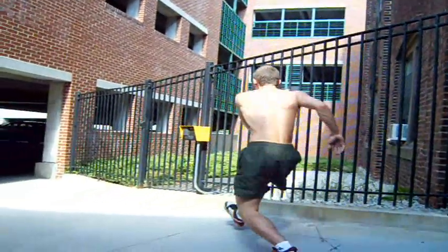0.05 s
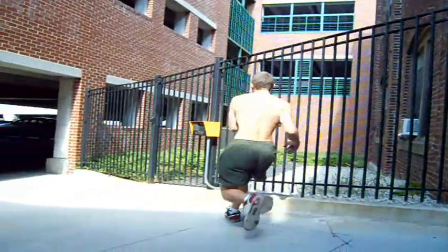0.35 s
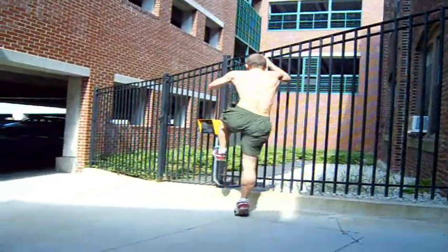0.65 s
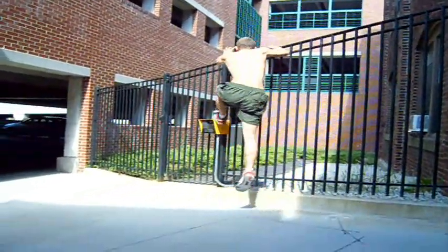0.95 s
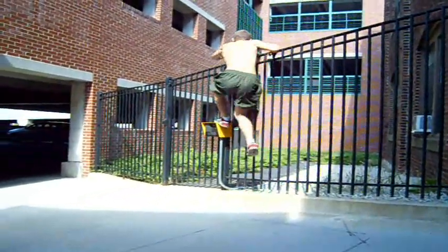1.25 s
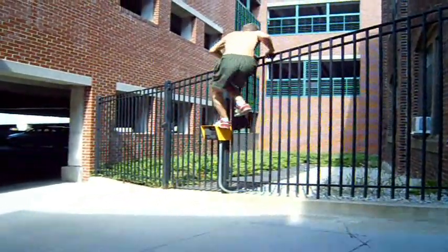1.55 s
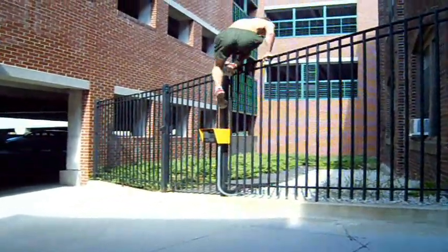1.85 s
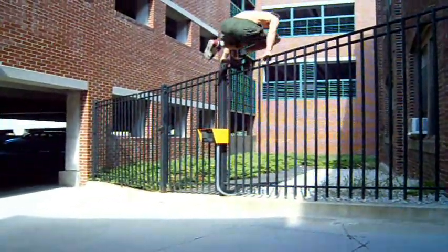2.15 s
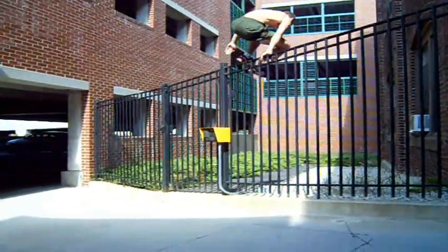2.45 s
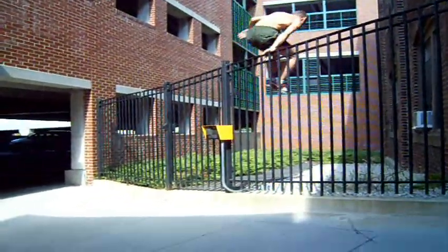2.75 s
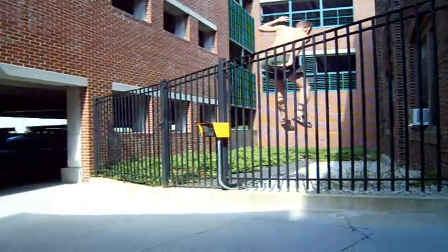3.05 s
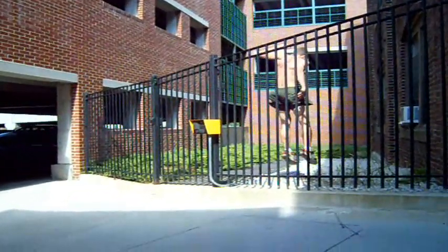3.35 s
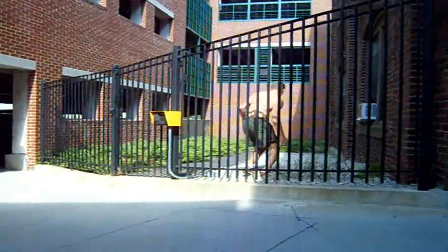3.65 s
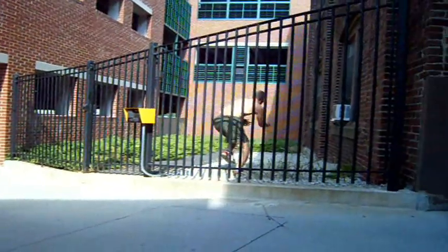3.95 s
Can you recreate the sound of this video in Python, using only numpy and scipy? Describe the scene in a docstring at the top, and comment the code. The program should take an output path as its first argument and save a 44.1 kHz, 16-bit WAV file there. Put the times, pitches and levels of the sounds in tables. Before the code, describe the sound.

A metal gate clanks and rattles under a climber's hands and shoes after a shoe slaps concrete. Feet then crunch onto gravel with a thud. Brick walls echo over low town noise, slightly dulled by a small microphone.

```python
"""A shoe slaps concrete, a steel picket gate clanks, and two feet crunch into gravel: a runner climbs over.
Shoes and hands scuff and knock the bars, which rattle and ring; brick walls throw every sound back.
Town noise and a low rumble of air lie underneath. The small microphone dulls the treble."""
import sys
import numpy as np
from scipy import signal
from scipy.fft import rfft, irfft
from scipy.io import wavfile

SR = 44100
rng = np.random.default_rng(int(sys.argv[2]) if len(sys.argv) > 2 else 0)


def file_out(sig):
    """Save sig as 16-bit WAV at sys.argv[1]."""
    # one column per channel
    cols = np.atleast_2d(sig).T
    # limit, then scale
    lim = np.clip(cols, -1, 1)
    pcm = np.round(lim * 32767).astype(np.int16)
    wavfile.write(sys.argv[1], SR, pcm)


N = 176400
T = np.arange(N) / SR
GRIT_PER_S = 7600
# The sharp tone of crackling sand. Each row: frequency in Hz, relative level in dB.
SAND_TONE = [(1500, -30), (3300, -20), (4500, 0), (8000, -2), (15000, -5)]


def gate():
    """Each knock on the gate is a bright tick and a short clank; the bars rattle briefly with it."""
    # Hands and shoes hit the bars. Each row: start in seconds, level in dB, pitch in Hz.
    knocks = [(1.246, -33, 1850), (1.314, -30.5, 1780), (1.346, -31, 1680), (1.4636, -14.5, 1590),
              (1.684, -22.5, 1600), (1.793, -31, 1480), (2.0145, -26.5, 1520), (2.073, -34, 1750),
              (2.1725, -23, 1500), (2.3925, -26, 1780)]
    # The tones of one clank. Each row: multiple of the pitch, level in dB, seconds to fade by 60 dB.
    clank_tones = [(.58, -23, .02), (.85, -4, .012), (1.0, -1, .012), (1.17, -3, .012)]
    # The tone of the rattling bars. Each row: frequency in Hz, relative level in dB.
    rattle_tone = [(300, -6), (900, -5.5), (1150, 0), (1400, 4), (1900, 0), (2400, -31), (3400, -9.5),
                   (5000, -7), (15000, -27)]
    treble = signal.butter(4, 3930, "high", fs=SR, output="sos")
    tick = signal.sosfilt(treble, rng.standard_normal(N))
    rattle = colour(grains(per_s=3000, spread_db=2.5), rattle_tone)
    out, lead_s = np.zeros(N), 0.0035
    for start, db, hz in knocks:
        force = amp(db) * (np.arange(N) == int(start * SR))
        for k, (ratio, tone_db, t60) in enumerate(clank_tones):
            out += (-1) ** k * amp(tone_db) * ring(force, hz * ratio, t60)
        out += tick * swell(start, db - 9.5, rise=0.001, t60=0.021)
        out += rattle * swell(start - lead_s, db - 13, rise=lead_s, t60=0.13)
    return out


def take_off():
    """Heel and sole strike the concrete in turn and make the shoe ring; the sole grinds on grit."""
    # Heel touch, heel weight and sole slap. Each row: time in seconds, level in dB, contact in seconds.
    pushes = [(.3088, -12, 0.00077), (.3205, -14, 0.0019), (.3873, -0.5, 0.00034)]
    # The ring of the shoe. Each row: pitch in Hz, level in dB, seconds to fade by 60 dB.
    shoe_tones = [(123, -13.5, 0.06), (225, -17, 0.09), (363, -10, 0.062), (388, -13, 0.074),
                  (660, -5.5, 0.034), (1256, -8, 0.082)]
    # The tone of grit under the sole. Each row: frequency in Hz, relative level in dB.
    sole_tone = [(80, -17), (300, -4), (480, -12), (660, 3.5), (850, -7.5), (1220, 5), (1480, -5),
                 (1720, 2.5), (2300, -7), (3300, -12.5), (6000, -15), (15000, -37)]
    force = np.zeros(N)
    for time, db, contact in pushes:
        push = np.exp(-2 * ((T - time) / contact) ** 2)
        force += amp(db) * push / push.sum()
    shoe = sum(amp(db) * ring(force, hz, t60) for hz, db, t60 in shoe_tones)
    grit = gritty(GRIT_PER_S, sole_tone, spread_db=2.1)
    return shoe + grit * swell(start=0.38, db=-15.5, rise=0.0066, t60=0.1, hold=0.007)


def landing():
    """One foot, then the other, crushes the gravel; loose stones settle."""
    # The crunches. Each row: start in seconds, level in dB, seconds to rise, seconds to fade by 60 dB.
    crunches = [(3.569, -18.5, 0.019, .14), (3.595, -12.5, 0.013, 0.13), (3.64, -27.5, 0.039, 0.9)]
    # The tone of gravel. Each row: frequency in Hz, relative level in dB.
    gravel_tone = [(100, -28), (330, 4), (560, 2), (850, -3), (1300, 0.5), (1800, 3.5), (2200, 2.5),
                   (2700, -0.5), (3400, 1), (4500, -1.5), (8000, -13), (15000, -17)]
    stones = gritty(per_s=9000, tone=gravel_tone, spread_db=1.5)
    return stones * sum(swell(*row) for row in crunches)


def thuds():
    """The body's weight comes down on the ground in dull bumps."""
    # The bumps. Each row: start in seconds, level in dB, seconds to rise, seconds to fade by 60 dB.
    bumps = [(.198, -35, .003, 0.052), (.308, -21.5, 0.013, 0.2), (3.597, -23.5, 0.028, 0.085),
             (3.647, -25.5, 0.0048, 0.49)]
    # The tone of a bump. Each row: frequency in Hz, relative level in dB.
    bump_tone = [(30, -19), (120, -9.5), (230, 2.5), (340, 2), (560, -10), (900, -37), (3000, -92)]
    return colour(rng.standard_normal(N), bump_tone) * sum(swell(*row) for row in bumps)


def scuffs():
    """Rubber and skin catch and slip many times in each rub, with a hoarse squeal."""
    # Shoes and hands rub on ground and bars. Each row: start in seconds, level in dB,
    # seconds to rise, seconds to fade by 60 dB, squeal pitch in Hz.
    rubs = [(0.097, -29, 0.00073, 0.027, 2220), (.135, -44, 0.006, 0.83, 2270),
            (0.269, -38.5, 0.011, 1, 2740), (0.782, -39.5, 0.018, 0.12, 3030),
            (0.952, -41, 0.004, .1, 1320), (1.111, -33.5, 0.013, 0.13, 1860),
            (1.16, -40.5, 0.025, 0.96, 1980), (1.78, -38, 0.0087, 0.18, 1430),
            (1.895, -41.5, 0.011, 0.12, 2080), (2.066, -39.5, 0.0041, 0.35, 1900),
            (2.388, -33, 0.0044, 0.21, 1870), (2.8, -42, 0.012, 0.54, 2320)]
    # The tone of slipping rubber. Each row: frequency in Hz, relative level in dB.
    rubber_tone = [(100, 1), (400, 8.5), (900, -1), (1400, 4), (1900, 2), (2500, -4.5), (3300, -8),
                   (5000, -1.5), (8000, -20.5), (15000, -18.5)]
    catches = gritty(GRIT_PER_S, rubber_tone, spread_db=3.5)
    out = np.zeros(N)
    for start, db, rise, t60, hz in rubs:
        squeal = unit(ring(rng.standard_normal(N), hz, t60=0.0079))
        out += (catches + amp(-6.5) * squeal) * swell(start, db, rise, t60)
    return out


def pickets(contact):
    """The gate's steel tubes go on ringing faintly after they are touched."""
    # The ring of the tubes. Each row: pitch in Hz, level in dB, seconds to fade by 60 dB.
    tube_tones = [(1005, -46, 0.16), (1404, -52, 0.26), (1824, -43.5, 0.069), (2055, -49, 0.094),
                  (2480, -45.5, 0.1), (2720, -43.5, 0.2)]
    return sum(amp(db) * ring(contact, hz, t60) for hz, db, t60 in tube_tones)


def yard(sound):
    """Brick walls send back a few clear echoes and a blurred wash that dies away."""
    # Echoes off the walls. Each row: delay in seconds, level in dB.
    echoes = [(.008, -19), (.031, -29), (.062, -22.5), (.088, -23.5)]
    # How long the wash lasts. Each row: frequency in Hz, seconds to fade by 60 dB.
    wash_fades = [(100, 2.1), (400, 1.8), (1000, 1.23), (2500, 1.31), (5000, 0.95), (14000, 1.1)]
    # How strong the wash is. Each row: frequency in Hz, level in dB.
    wash_levels = [(100, -8.5), (350, -13.5), (700, -9), (1500, -7.5), (3000, -11), (6000, -10.5),
                   (14000, -12.5)]
    edges_hz, out = np.geomspace(70, 17000, 15), np.zeros(N)
    for low, high in zip(edges_hz, edges_hz[1:]):
        band = signal.butter(3, [low, high], "band", fs=SR, output="sos")
        hz = np.sqrt(low * high)
        # Smear this band's energy over time, then let noise follow its loudness.
        decay = swell(0, 0, rise=0.019, t60=at_hz(wash_fades, hz)) ** 2
        energy = signal.sosfilt(band, sound + 1e-18) ** 2
        smeared = signal.fftconvolve(energy, decay / decay.sum())[:N]
        noise = unit(signal.sosfilt(band, rng.standard_normal(N)))
        out += amp(at_hz(wash_levels, hz)) * np.sqrt(np.abs(smeared)) * noise
    for delay, db in echoes:
        out += amp(db) * np.interp(T - delay, T, sound, left=0)
    return out


def background():
    """A low rumble of air and the noise of the town each swell and sink slowly."""
    # The tone of each. Each row: frequency in Hz, relative level in dB.
    rumble_tone = [(10, 1.5), (24, 2.5), (31, -2.5), (40, -9.5), (50, -7), (80, -10.5), (145, -8),
                   (200, -26), (500, -48)]
    town_tone = [(40, 7), (140, 0), (200, 1), (350, 0), (550, -4.5), (1000, -7.5), (1900, -13.5),
                 (3000, -22.5), (5000, -22.5), (8000, -30.5), (15000, -39.5)]
    # The loudness of each. Each row: time in seconds, level in dB.
    rumble_levels = [(0, -28.5), (.4, -38.5), (.9, -38), (1.3, -37.5), (1.9, -39), (2.7, -34),
                     (3.45, -29.5), (3.85, -35.5), (4, -38)]
    town_levels = [(0, -35.5), (.3, -34), (0.701, -41), (1.05, -40.5), (1.5, -38), (2.05, -39),
                   (2.65, -36.5), (3.099, -34.5), (3.5, -33.5), (4, -38.5)]
    out = np.zeros(N)
    for tone, levels in ((rumble_tone, rumble_levels), (town_tone, town_levels)):
        gain = amp(np.interp(T, *np.transpose(levels)))
        out += gain * colour(rng.standard_normal(N), tone)
    return out


def crackle():
    """The treble of the background crackles very faintly."""
    return amp(-54) * colour(grains(per_s=320, spread_db=2.5), SAND_TONE)


def gritty(per_s, tone, spread_db):
    """Many small collisions in a given tone, with sparse sand crackle on top."""
    grit = colour(grains(per_s, spread_db), tone)
    sand = colour(grains(per_s=720, spread_db=4.5), SAND_TONE)
    return grit + amp(-8) * sand


def grains(per_s, spread_db):
    """Tiny collisions make random clicks of uneven size."""
    sizes_db = spread_db * np.minimum(rng.exponential(1, N), 3.2)
    clicks = amp(sizes_db) * rng.choice([-1, 1], N)
    return clicks * (rng.random(N) < per_s / SR)


def ring(force, hz, t60):
    """A push sets off one tone, which fades by 60 dB in t60 seconds."""
    decay, angle = amp(-60 / (t60 * SR)), 2 * np.pi * hz / SR
    return signal.lfilter([0, np.sin(angle)], [1, -2 * decay * np.cos(angle), decay ** 2], force + 1e-18)


def swell(start, db, rise, t60, hold=0):
    """Loudness rises, holds, then fades by 60 dB every t60 seconds."""
    fading_s = np.maximum(T - start - rise - hold, 0)
    return amp(db - 60 * fading_s / t60) * np.clip((T - start) / rise, 0, 1)


def colour(x, tone):
    """Give a steady sound a tone, at a standard strength."""
    hz = np.arange(N // 2 + 1) * SR / N
    return unit(irfft(rfft(x) * amp(at_hz(tone, hz)), N))


def at_hz(table, hz):
    """Read between a table's rows, with octaves evenly spaced."""
    freqs, values = np.transpose(table)
    return np.interp(np.log(np.maximum(hz, 1)), np.log(freqs), values)


def unit(x):
    """Scale to an average strength (rms) of 1."""
    return x / np.sqrt(np.mean(x ** 2) + 1e-20)


def amp(db):
    """Turn decibels into a gain."""
    return 10 ** (np.asarray(db) / 20)


def scene():
    """The runner's sounds echo round the yard, over the background."""
    climb = gate() + scuffs()
    steps = take_off() + thuds()
    crossing = climb + pickets(climb) + landing()
    reflections = yard(amp(-0.5) * steps + amp(-1) * crossing)
    return (steps + crossing + reflections + background() + crackle())[None]


def record(dry):
    """The small microphone turns the treble down and cuts off the very top."""
    edge_hz, treble_db, cutoff_hz = 3650, -16, 15850
    low = signal.sosfilt(signal.butter(14, edge_hz, fs=SR, output="sos"), dry)
    high = signal.sosfilt(signal.butter(6, edge_hz, "high", fs=SR, output="sos"), dry)
    top_cut = signal.ellip(12, 0.1, 80, cutoff_hz, fs=SR, output="sos")
    return signal.sosfilt(top_cut, low + amp(treble_db) * high)


dry = scene()
out = record(dry)
file_out(out)
```